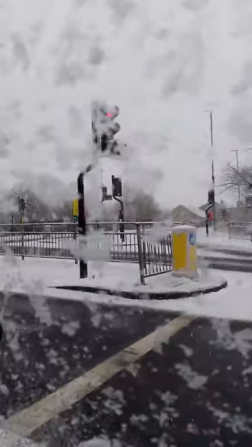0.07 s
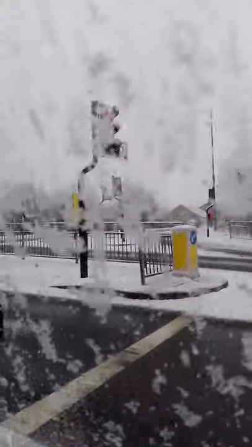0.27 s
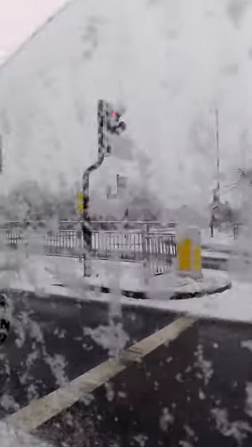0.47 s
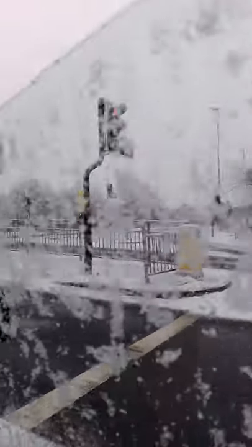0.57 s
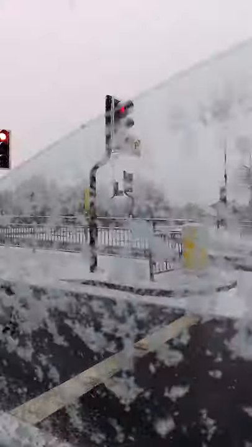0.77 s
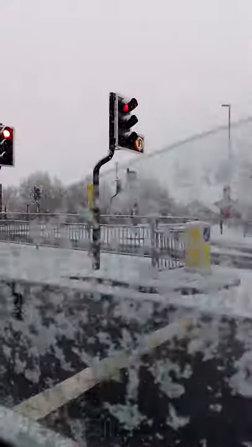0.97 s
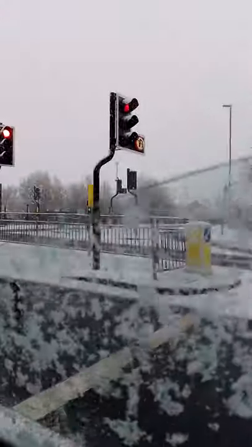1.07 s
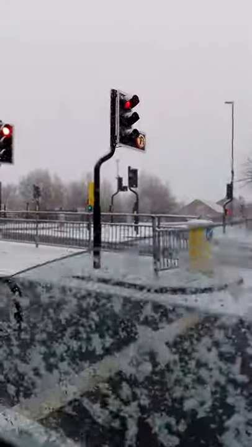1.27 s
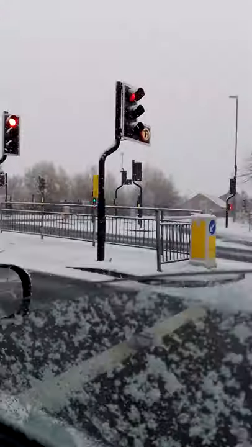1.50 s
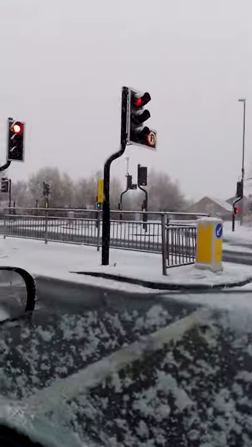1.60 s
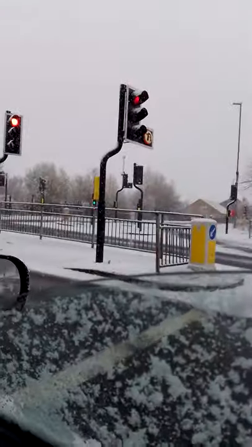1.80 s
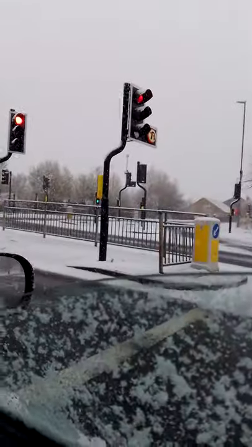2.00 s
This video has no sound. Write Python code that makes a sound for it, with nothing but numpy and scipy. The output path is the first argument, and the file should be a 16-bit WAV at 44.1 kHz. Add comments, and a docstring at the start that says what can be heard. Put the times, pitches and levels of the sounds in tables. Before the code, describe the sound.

A car's power window slides open with a whir and hiss, ending in a click.

```python
"""A quiet cabin rumble, then a switch clicks and an electric window runs for a second and a half.
One microphone inside a standing car, close to the door. The glass jerks free of its seal with a knock,
and the motor whirs while the wet pane hisses along the rubber. The drive slows under load,
the rubber squeaks faintly, the hiss dies away and a last click rings the latch."""
import sys
import numpy as np
from scipy import signal
from scipy.fft import rfft, irfft
from scipy.io import wavfile

SR = 44100
rng = np.random.default_rng(int(sys.argv[2]) if len(sys.argv) > 2 else 0)


def waveform_to_disk(signal):
    """Save audio, clipped to [-1, 1], as 16-bit WAV at the path in sys.argv[1]."""
    frames = np.transpose(np.atleast_2d(signal))
    scaled = np.clip(frames, -1, 1) * 32767
    samples = np.round(scaled).astype(np.int16)
    wavfile.write(sys.argv[1], SR, samples)


N = 90404
T = np.arange(N) / SR

# motor speed: t/s, turns per second/Hz
MOTOR_SPEED = [(.13, 59.6), (.22, 95.1), (.3, 101.9), (.39, 114.9), (.48, 120), (.65, 120.9), (.8, 117.9),
               (.92, 114), (1.04, 109.1), (1.13, 101), (1.27, 102.5), (1.5, 97.15), (1.77, 90.3)]
# resonances of the door, which colour motor and gear: f/Hz, level/dB
DOOR_RESPONSE = [(40, -37), (75, -14), (105, -1), (140, -6.5), (168, -24.5), (240, 1), (340, -2),
                 (415, -16), (550, 5), (710, -13), (850, 3.5), (985, -9), (1060, 1), (1200, 2), (1310, -14),
                 (1420, -2), (1830, -3), (2600, -15), (4000, -33)]


def from_db(db):
    """Decibels to gain."""
    return 10 ** (np.asarray(db) / 20)


def rms_one(x):
    """Scale to unit power."""
    return x / np.sqrt(np.mean(x ** 2) + 1e-20)


def curve(rows):
    """Join (time, value) points by straight lines."""
    return np.interp(T, *np.transpose(rows))


def drift(rate_hz):
    """Smooth random motion of spread 1."""
    hz = np.arange(N // 2 + 1) * SR / N
    return rms_one(irfft(rfft(rng.standard_normal(N)) / (1 + (hz / rate_hz) ** 2), N))


def coloured(points, drive=1, tilt_db=0):
    """Unit-power noise, swelling with the drive, shaped by a (Hz, dB) spectrum and a tilt per octave."""
    octave = np.log2(np.maximum(np.arange(N // 2 + 1) * SR / N, 1))
    hz, db = np.transpose(points)
    below = np.minimum(octave - np.log2(hz[0]), 0)
    gain = from_db(np.interp(octave, np.log2(hz), db) + tilt_db * octave + 20 * below)
    return rms_one(irfft(rfft(rng.standard_normal(N) * drive) * gain, N))


def narrow(hz, width_hz):
    """A resonance kept ringing at random: a tone of wavering strength and phase."""
    phase = 2 * np.pi * hz * T
    return rms_one(drift(width_hz) * np.sin(phase) + drift(width_hz) * np.cos(phase))


def blow(start, attack, t60):
    """A quick rise and an exponential decay."""
    age = np.maximum(T - start, 0)
    return np.minimum(age / attack, 1) * np.exp(-np.log(1000) * np.maximum(age - attack, 0) / t60)


def arch(start, end):
    """A half-sine swell and fade."""
    return np.sin(np.pi * np.clip((T - start) / (end - start), 0, 1))


def cabin():
    """The quiet, steady rumble all around the microphone."""
    # rumble spectrum: f/Hz, level/dB
    spectrum = [(25, -30), (60, -13.5), (108, -5.5), (140, -13.5), (172, -21), (225, -4.5), (290, -5),
                (440, -9.5), (640, -16), (730, -8.5), (900, -11.5), (1800, -25.5), (3400, -32), (8800, -34),
                (12000, -27.5)]
    return from_db(-64.5) * coloured(spectrum)


def pane(rotor_angle):
    """Tiny slips of glass on rubber, pulsing with the motor, make a grainy hiss, a rub and a thin top."""
    # hiss on the seal, coarser rub in the guide channels, highest treble: t/s, level/dB
    hiss_level = [(.115, -79), (.135, -49), (.165, -39), (.22, -43.5), (.255, -45), (.28, -32.5),
                  (.335, -41), (.45, -39.5), (.9, -39.5), (1.08, -40.5), (1.58, -41), (1.69, -50.5),
                  (1.765, -55), (1.80, -69), (1.86, -70.5), (1.96, -79.5)]
    rub_level = [(.108, -105), (.121, -50), (.135, -53), (.17, -44), (.24, -55), (.258, -53.5),
                 (.278, -36.5), (.34, -42.5), (.5, -47), (.65, -45), (1.03, -45.5), (1.07, -50),
                 (1.12, -47), (1.46, -49.5), (1.6, -60.5), (1.76, -59.5), (1.83, -110)]
    top_level = [(.11, -105), (.15, -62), (.24, -67), (.28, -48), (.36, -55), (1.2, -59), (1.77, -56),
                 (1.82, -105)]
    # their spectra: f/Hz, level/dB
    hiss_spectrum = [(4500, -55), (6100, -21), (6600, -9.5), (7600, -5.5), (8300, 0.5), (9000, -1.5),
                     (9500, -7), (10000, -26.5), (10600, -32), (16000, -30.5)]
    rub_spectrum = [(1200, -5), (1800, -11), (2500, -5), (3150, -0.5), (3800, 2.5), (4400, 1), (5000, -1.5),
                    (5700, 2.5), (6200, -1), (8000, -3.5), (9700, 9.5), (10200, 5), (10650, -6.5),
                    (11450, 1.5), (12000, -11.5), (16000, -26)]
    top_spectrum = [(9000, -21), (10500, -7), (12500, 1), (13600, 4), (15600, -1.5)]
    grain_db = .7 * drift(320)
    surge_db = .96 * drift(23)
    slips = from_db(grain_db + surge_db) * (1 + .08 * np.sin(2 * rotor_angle))
    layers = [(hiss_level, hiss_spectrum), (rub_level, rub_spectrum), (top_level, top_spectrum)]
    return sum(from_db(curve(level)) * coloured(spectrum, slips) for level, spectrum in layers)


def interior(x, count=40, echo_db=-8, t60=.053):
    """Close reflections from glass and trim follow the direct sound and are quickly absorbed."""
    delay_s = rng.uniform(.002, .04, count)
    taps = rng.choice([-1, 1], count) * np.exp(-np.log(1000) * delay_s / t60)
    response = np.bincount((delay_s * SR).astype(int), taps / np.linalg.norm(taps))
    return x + from_db(echo_db) * signal.fftconvolve(x, response)[:N]


def gear():
    """The gear rumbles unevenly inside the door."""
    # gear rumble: t/s, level/dB
    level = [(.115, -85), (.14, -43.5), (.26, -52), (.35, -54.5), (.46, -56), (.8, -55), (1.3, -56),
             (1.46, -55), (1.58, -67), (1.76, -67), (1.84, -105)]
    return from_db(curve(level)) * coloured(DOOR_RESPONSE, drive=from_db(1.6 * drift(39)))


def clicks(attack_s=.0006, tail_t60=.08, latch_s=1.7712):
    """Switch and latch give bright cracks with a high ring and a short tail; the latch rings on."""
    # clicks: t/s, level/dB, t60/s, relative tail/dB, relative ring/dB, tilt/(dB per octave)
    strikes = [(.1258, -33.5, 0.02, -16, 4, -1.5), (.153, -24.5, .014, -12, -2, 2),
               (1.7692, -42, .03, -20, -8, 1), (1.7721, -26, .008, -19, -10, 5.5)]
    # crack spectrum: f/Hz, level/dB
    spectrum = [(300, -14), (1000, -11), (1450, -17), (2500, -18), (3100, -3.5), (4400, -4.5), (5800, -6.5),
                (7500, -2), (9800, 5), (10700, -1.5), (14000, -6), (16500, -11.5)]
    # modes of the latch at the last click: f/Hz, level/dB, t60/s
    latch_modes = [(1180, -44, 0.03), (1460, -42.5, 0.041), (1850, -48, 0.042), (3860, -51.5, 0.039),
                   (4400, -49, 0.033), (8890, -42, 0.081), (14100, -34, .022)]
    out = np.zeros(N)
    for start, db, t60, tail_db, ring_db, tilt_db in strikes:
        crack = coloured(spectrum, tilt_db=tilt_db) + from_db(ring_db) * narrow(8930, width_hz=270)
        envelope = blow(start, attack_s, t60) + from_db(tail_db) * blow(start, attack_s, tail_t60)
        out += from_db(db) * crack * envelope
    for hz, db, t60 in latch_modes:
        out += from_db(db) * np.sin(2 * np.pi * hz * (T - latch_s)) * blow(latch_s, .0015, t60)
    return out


def motor(rotor_angle):
    """Unsteady partials of the rotor, loud where they meet a resonance of the door."""
    # motor whir: t/s, level/dB
    level = [(.15, -92), (.27, -62), (.7, -59.5), (.98, -55), (1.14, -65), (1.42, -64.5), (1.58, -68.5),
             (1.85, -100)]
    # partials: multiple of the speed, relative level/dB
    partials = [(2, -3.5), (3, -3.5), (5, -1.5), (7, -7), (10, -1)]
    whir = np.zeros(N)
    for order, db in partials:
        door_db = np.interp(order * curve(MOTOR_SPEED), *np.transpose(DOOR_RESPONSE))
        flutter_db = 5 * drift(22)
        tone = np.sin(order * rotor_angle + 2 * np.pi * rng.random())
        whir += from_db(db + door_db + flutter_db) * tone
    return from_db(curve(level)) * rms_one(whir)


def judder():
    """The glass sticks and slips as it drags out of the seal, shaking the door in uneven bursts."""
    # shaking of the door: t/s, level/dB
    level = [(.18, -93), (.215, -42.5), (.28, -45), (.38, -54), (.62, -89)]
    # its spectrum: f/Hz, level/dB
    spectrum = [(110, -3.5), (160, -17), (300, 2.5), (480, -6), (780, -5), (1500, -28.5)]
    jerks = from_db(1.5 * drift(32))
    return from_db(curve(level)) * coloured(spectrum, jerks)


def knocks(attack_s=.0035):
    """Each knock of glass or mechanism is a dull clatter that sets the door's modes ringing."""
    # knocks: t/s, level/dB, t60/s, tilt/(dB per octave)
    strikes = [(0.188, -28.5, 0.028, 2.5), (.195, -28.5, .06, .5), (.256, -45, .11, 1),
               (1.054, -53, .06, 3), (1.787, -55, 0.076, 1.5)]
    # clatter spectrum: f/Hz, level/dB
    spectrum = [(50, -34), (115, -17), (160, -26), (230, -6), (295, 2), (400, -3), (445, -11), (500, -4),
                (720, -6), (880, 0), (985, -17), (1150, -4), (1290, -19), (1500, -11), (2100, -17),
                (3000, -25), (6000, -33)]
    # modes of the door: f/Hz, relative level/dB, t60/s
    door_modes = [(233, -11, 0.32), (302.2, -5.5, .13), (372, -10.5, 0.15), (489, -9, 0.21),
                  (900, -11.5, 0.09), (1140, -6.5, 0.032)]
    mode_hz, mode_db, mode_t60 = np.transpose(door_modes)
    out = np.zeros(N)
    for start, db, t60, tilt_db in strikes:
        out += from_db(db) * coloured(spectrum, tilt_db=tilt_db) * blow(start, attack_s, t60)
        gains = from_db(db + mode_db) * rms_one(from_db(tilt_db * np.log2(mode_hz)))
        for hz, gain, ring_t60 in zip(mode_hz, gains, mode_t60):
            out += gain * np.sin(2 * np.pi * hz * (T - start)) * blow(start, attack_s, ring_t60)
    return out


def drones(rotor_angle):
    """Under changing load one motor partial after another swells into a shuddering groan of the door."""
    # groans: multiple of the speed, start/s, peak/s, end/s, level/dB, spread/Hz, roughness (0-1)
    groans = [(3, .27, .37, .47, -52, 35, .6), (5, .87, 1.03, 1.09, -59, 25, .35),
              (5, 1.02, 1.15, 1.41, -54.5, 50, .6), (4, 1.15, 1.36, 1.43, -61.5, 16, .4)]
    out = np.zeros(N)
    for order, start, peak, end, db, spread_hz, roughness in groans:
        swell = np.sin(np.pi / 2 * np.interp(T, [start, peak, end], [0, 1, 0]))
        shudder = 1 + roughness * (drift(spread_hz) + 1j * drift(spread_hz))
        out += from_db(db) * swell * rms_one(np.real(shudder * np.exp(1j * order * rotor_angle)))
    return out


def hollowed(x, fade_s=.043):
    """Narrow gliding notches fade in and out, slightly hollowing the treble of the running sound."""
    # notches: start/s, end/s, first f/Hz, last f/Hz, half-width/Hz, depth (0-1)
    notches = [(0.43, 1.68, 2640, 2674, 83, 0.96), (1.13, 1.62, 2990, 2930, 77, 1),
               (1.01, 1.6, 4450, 5540, 550, 0.55)]
    for start, end, first_hz, last_hz, width_hz, depth in notches:
        centre_hz = curve([(start, first_hz), (end, last_hz)])
        carrier = np.exp(2j * np.pi * np.cumsum(centre_hz) / SR)
        band = signal.sosfiltfilt(signal.butter(1, width_hz, fs=SR, output="sos"), x / carrier)
        fade = np.clip(np.minimum(T - start, end - T) / fade_s, 0, 1)
        x = x - 2 * depth * fade * np.real(band * carrier)
    return x


def scuff():
    """A brief, hollow scrape of the pane in its guide."""
    # the scrape: start/s, end/s, level/dB
    scrape = (.488, .54, -47.5)
    # its spectrum: f/Hz, level/dB
    spectrum = [(700, -9), (1050, 3), (1800, -6.5), (2400, -20), (6000, -50)]
    start, end, db = scrape
    return from_db(db) * arch(start, end) * coloured(spectrum)


def squeaks():
    """The rubber squeaks faintly: narrow, wavering tones that swell and fade as the pane slows."""
    # squeaks: start/s, end/s, f/Hz, width/Hz, level/dB
    tones = [(1.3, 1.598, 3130, 85, -63), (1.32, 1.667, 4020, 70, -62)]
    return sum(from_db(db) * arch(start, end) * narrow(hz, width_hz)
               for start, end, hz, width_hz, db in tones)


def scene():
    """The running window, its clicks and knocks, and the cabin's rumble, in mono from beside the door."""
    speed_hz = curve(MOTOR_SPEED) * (1 + .016 * drift(40.5))
    rotor_angle = 2 * np.pi * np.cumsum(speed_hz) / SR
    rubbing = interior(pane(rotor_angle))
    drive = motor(rotor_angle) + gear() + drones(rotor_angle)
    running = hollowed(rubbing + drive) + judder() + squeaks() + scuff()
    return (running + clicks() + knocks() + cabin())[None]


def record(dry, cutoff_hz=15900):
    """The microphone's signal, with the top cut steeply."""
    return signal.sosfilt(signal.ellip(10, .1, 70, cutoff_hz, fs=SR, output="sos"), dry)


dry = scene()
out = record(dry)
waveform_to_disk(out)
```